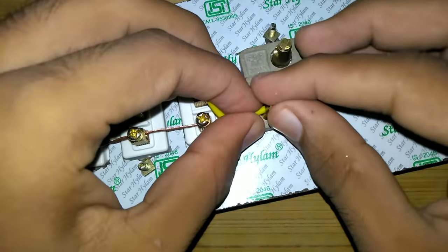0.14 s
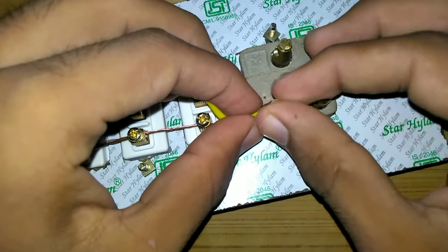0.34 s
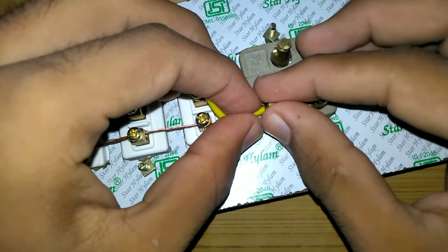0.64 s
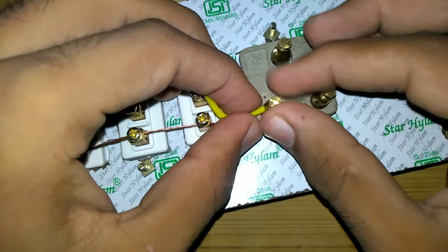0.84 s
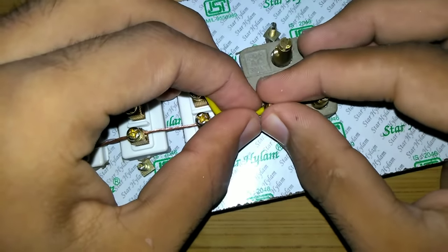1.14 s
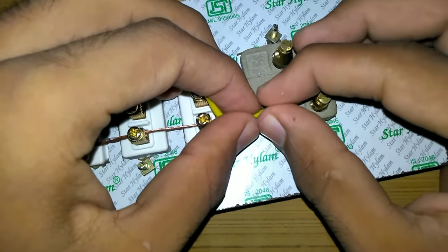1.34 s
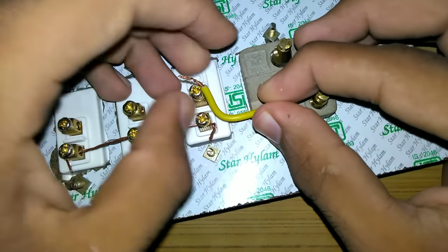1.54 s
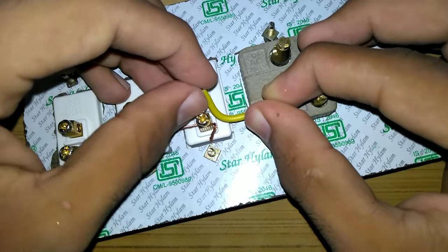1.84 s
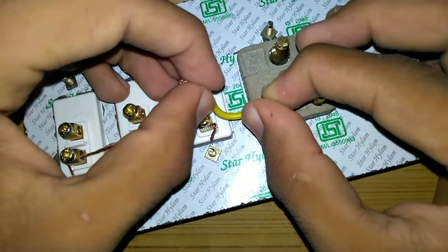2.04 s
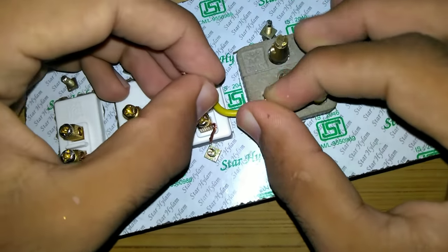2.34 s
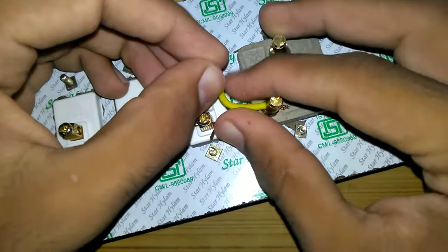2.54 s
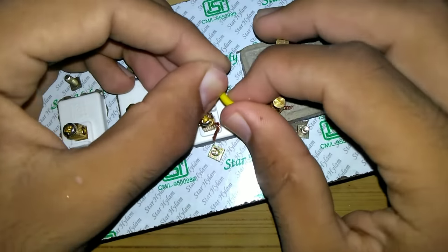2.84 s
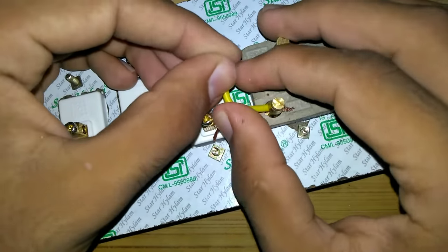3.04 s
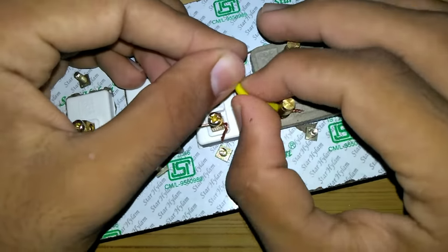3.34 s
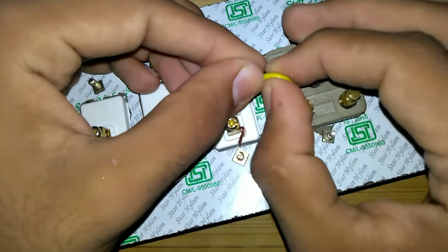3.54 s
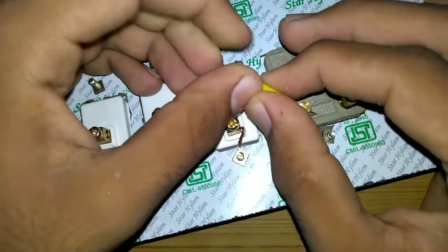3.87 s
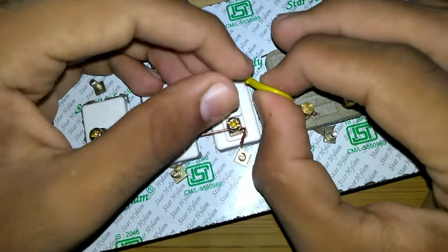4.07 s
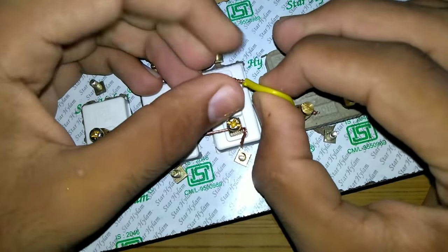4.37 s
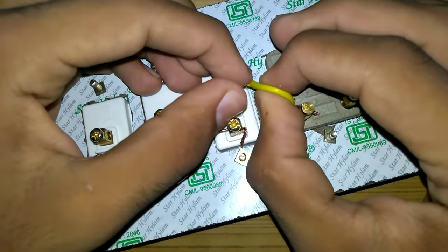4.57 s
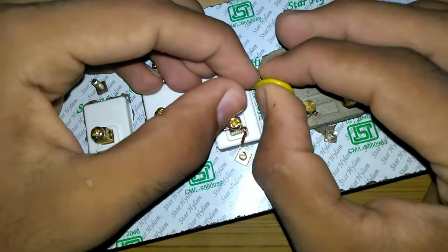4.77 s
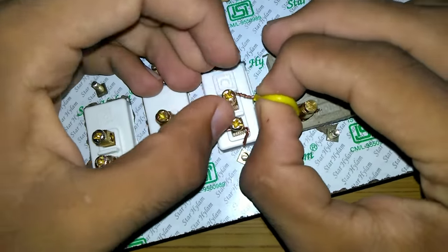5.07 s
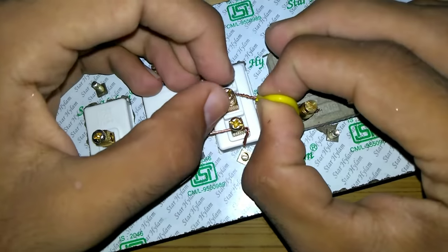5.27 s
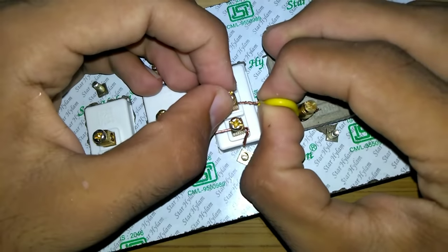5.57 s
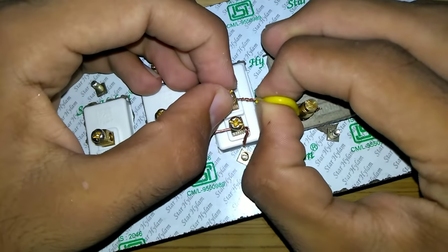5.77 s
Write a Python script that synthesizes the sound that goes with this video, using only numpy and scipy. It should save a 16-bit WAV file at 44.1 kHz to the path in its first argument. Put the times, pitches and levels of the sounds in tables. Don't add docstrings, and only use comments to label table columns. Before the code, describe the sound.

A close phone microphone at an indoor desk picks up hands working a wire among brass screw terminals on a thin board. A firm low bump comes at 0.15 s, then dry clicks, wire slips and skin rubbing crowd the first second, with a brassy cluster near 1.0. It thins until a light tick at 1.5 and a crisp, bright one at 1.85. Small slips follow around 2.2, then the strongest later board knock at 2.53 with clicks around it and low hand rumble to about 2.8. Tiny strand ticks and rubbing run through 3.0-3.5, leading to the sharpest metallic snap and ping at 3.58. Another bright tick lands at 4.18, a smaller one at 4.6, then slips and clicks near 5.07, 5.33-5.45, 5.62 and 5.84. Contacts last milliseconds with little room echo; hiss blooms after them and fades unevenly within fractions of a second, nearly silent between.

```python
import sys
import numpy as np
from scipy import signal
from scipy.fft import rfft, irfft
from scipy.io import wavfile
from scipy.ndimage import uniform_filter1d

SR = 44100
rng = np.random.default_rng(int(sys.argv[2]) if len(sys.argv) > 2 else 0)


def natural_amplitude(level_db):
    exponent = np.asarray(level_db, float) / 20
    return 10 ** exponent


def to_wav(sig):
    pcm = np.clip(np.atleast_2d(sig), -1, 1) * 32767
    pcm = np.round(pcm).astype(np.int16)
    wavfile.write(sys.argv[1], SR, pcm.T)


N = 260631

# (frequency [Hz], level per Hz [dB])
ROOM_HISS = [(110, -40), (180, -4.5), (283, -9), (383, 3.5), (769, -11.5), (845, -10), (928, -6),
             (1140, -7), (1410, -6.5), (1670, -8.5), (4700, -10), (6470, -9), (11400, -14.5),
             (15400, -26.5), (16300, -51)]
# (time [s], weight [dB], time to fade 20 dB [s])
LEANING_HANDS = [(.02, -53.5, 0.23), (0.139, -34, 0.3), (0.481, -38.5, 0.09), (0.898, -38.5, 0),
                 (1.069, -57, 0.4), (1.202, -53, 0.33), (1.33, -49.5, 0.4), (1.508, -44.5, 0.25),
                 (1.727, -41, 0.18), (1.896, -42.5, 0.42), (2.159, -46, 0.3), (2.38, -45, 1),
                 (2.52, -33, 0.14), (2.8, -37, 0.24), (3.069, -43.5, 0.1), (3.34, -36, -0.5),
                 (3.69, -53.5, 0.6), (3.95, -48, 0.53), (4.18, -55.5, -0.28), (4.442, -53.5, 0.54),
                 (4.77, -65.5, 3.3), (5.049, -61, .3), (5.199, -62, 0.16), (5.401, -49, 0.25),
                 (5.6, -63, -1.5), (5.831, -68, -4)]
# (start [s], length [s], pressure [dB], dryness [dB])
SKIN_SLIDES = [(0, 0.17, -46, -33), (0.254, 0.31, -50.5, -21), (0.51, 0.55, -48.5, -19),
               (0.99, 0.31, -60.5, 10.5), (2.182, 0.15, -62.5, 17), (2.416, 0.18, -45.5, -23),
               (2.614, 0.21, -44, -14), (2.859, 0.25, -50, -26), (3.203, 0.073, -57, -3.5),
               (3.348, 0.25, -43, -3.5), (3.645, 0.21, -62, 17), (4.395, 0.059, -48.5, -22.5),
               (1.52, 0.041, -52.5, 3), (1.766, 0.12, -53, -21), (4.146, .1, -53, -27),
               (5.301, 0.17, -60.5, -21.5), (2.292, 0.076, -60, -21), (3.612, 0.031, -53, -24.5),
               (0.05, 0.053, -74, -4), (3.358, 0.31, -67, 9.5)]
# (frequency [Hz], level [dB], t60 [s])
BOARD_MODES = [(80.9, -3.5, 0.31), (110.6, -2.5, 0.29), (155.8, -1.5, 0.15), (218.6, -13.5, 0.19),
               (354.5, -3.5, 0.065), (408.3, -2.5, 0.095), (547, 1.5, 0.083), (732, -9, 0.043),
               (790, -2.5, 0.027), (1060, -26.5, 0.054)]
# (time [s], strength [dB], length [ms])
LIGHT_TAPS = [(.012, -32, 3.2), (.752, -31.5, 8.9), (.805, -38.5, 6.1), (1.156, -30, 8.4),
              (1.284, -33, 2.9), (2.392, -42, 8.5), (3.566, -51.5, 5.1), (3.969, -33.5, 6.2),
              (4.428, -39, 5), (4.452, -43.5, 3), (5.449, -36, 4.6), (3.28, -42.5, 7.6), (4.124, -34.5, 4),
              (4.709, -45.5, 6), (4.97, -40, 8.2), (5.074, -49, 4.6), (5.089, -47, 7.7)]
# (time [s], strength [dB], share in the high modes [dB], length [ms])
BOARD_BUMPS = [(.142, -34, -20, 9.5), (0.152, -13.5, -7, 2.9), (.27, -35.5, 3, 6.2),
               (.488, -26.5, -24, 7.1), (0.672, -43, 13, 8.6), (0.906, -40, 7, 4.5),
               (0.979, -34.5, -1, 10.4), (1.516, -46, 10.5, 9.1), (1.744, -38.5, -10.5, 7.6),
               (1.769, -39, -16, 2.6), (1.901, -25.5, -13, 4.8), (2.187, -39, 3, 4.3),
               (2.451, -62, -1, 9.5), (2.527, -13.5, 5, 3.4), (2.589, -29, -3, 2.9), (2.766, -33, -26, 2.1),
               (2.812, -25, -16, 3.76), (3.086, -28, -25, 2.6), (3.206, -39, -22, 4),
               (3.346, -35.5, -15, 4.4), (3.45, -55, -12, 3), (3.863, -33, -2, 3.95),
               (4.364, -38.5, -18, 6.9), (5.395, -41.5, -27, 5.2), (5.625, -36.5, 3, 4.7),
               (5.845, -36.5, -9.5, 7.1)]
# (centre [Hz], width [Hz])
CRACK_BANDS = [(1310, 1970), (3150, 3000), (9700, 4500), (6560, 2380)]
# (centre [Hz], width [Hz], level [dB])
BRASS_BANDS = [(1414, 223, -1.5), (2040, 38, -22.5), (3020, 336, -4), (4330, 660, -5), (5080, 990, -5),
               (7170, 130, -8), (8970, 260, -4), (10740, 550, -11)]
# (time [s], strength [dB], edge of nail [dB])
FINGER_KNOCKS = [(.0341, -33, -23), (0.152, -38, -31), (.7526, -33.5, -27.5), (0.9309, -31.5, -29),
                 (1.0001, -23, -11), (1.1328, -42, -11), (1.1572, -43, -30), (1.286, -43, -5.5),
                 (1.536, -48, -7), (2.1519, -42, -7), (2.753, -43.5, 0.5), (2.8462, -41, -2.5),
                 (3.034, -49.5, 9), (3.0648, -52, -10), (3.0909, -47, 1), (3.2797, -45, -4),
                 (3.5641, -36, -10), (3.8483, -35, -39), (3.9144, -62, -17), (4.0911, -41.5, -4),
                 (4.3653, -41.5, -3.5), (4.4524, -42, -2), (4.7084, -42.5, -10), (4.9714, -43, -6.5),
                 (5.2794, -41, -14)]
# (time [s], strength [dB], share in the board [dB], share in the switch body [dB])
STRAND_BRUSHES = [(.040, -34.5, -2.5, -5.5), (.050, -39, -14, -4), (0.061, -44, -7, -7),
                  (.433, -24, -13, -5), (.688, -36.5, -13, 3), (0.775, -40, -21, -4), (.868, -46, 2, 2),
                  (1.5348, -43, -13, -3.5), (2.59, -27, -22, -9), (2.765, -36.5, -11, -16),
                  (2.917, -41, -4.5, -9), (3.024, -47, -6, -12), (3.094, -35.5, -12, -7.5),
                  (3.575, -20.5, -19, -14), (3.602, -30, -17, -10.5), (4.203, -45, -16, -9),
                  (5.109, -37, -15, -11.5), (5.389, -28, -12, -12), (5.401, -38, -10, -12)]
# (time [s], strength [dB], share in the board [dB], share in the switch body [dB])
SCREW_CONTACTS = [(.179, -34.5, -27, -38), (.2359, -22.5, -10.5, -11), (.4234, -28, -13, -2),
                  (.536, -24, -19, -6.5), (.5567, -30.5, -7, -11), (.6719, -33, -6, -1.5),
                  (1.0066, -23, -61, -6.5), (1.7389, -27, -12.5, -10), (1.8548, -12, -34, -17),
                  (2.1789, -27.5, -22.5, -8), (2.488, -23, -8.5, 1), (2.4978, -28.5, -1.5, -8),
                  (2.5293, -22.5, -4.5, -7.5), (2.5879, -27, -7, -6), (3.0495, -39, -39, -14),
                  (3.3094, -33, -9, -30), (3.3737, -35, -5, -11), (3.5135, -28, -13.5, -15.5),
                  (3.5689, -25, -14.5, -11), (3.5759, -11, -23, -23), (3.6494, -37, 5.5, -14),
                  (3.6967, -33, -6, -18), (4.1242, -29.5, -13.5, -11), (4.1774, -12.5, -32.5, -19.5),
                  (4.5925, -26, -18.5, -10.5), (5.0438, -26, -12.5, -17.5), (5.3966, -23.5, -19, -11.5),
                  (5.449, -30, -7, -14), (5.6239, -29, -10, -13)]
# (time [s], strength [dB], share in the board [dB], share in the switch body [dB])
WIRE_SLIPS = [(.2764, -31.5, -2, -1.5), (.4095, -28.5, -7.5, -10), (.440, -22.5, -11, -21),
              (.626, -24.5, -19, -27), (.8976, -25, -15, -2), (.9079, -24.5, -11, -13.5),
              (.9782, -18.5, -40, -6.5), (1.1706, -35.5, 1, -4), (1.4651, -49, -44, -55),
              (1.5162, -36, -21.5, -5.5), (2.1909, -24.5, -50, -59), (2.2128, -21.5, -22.5, -37.5),
              (2.2293, -27.5, -14, -15.5), (2.4547, -32.5, -9, -9), (2.4672, -26.5, -19.5, -13.5),
              (2.5816, -27, -16, -18.5), (2.8199, -33, -18, -16.5), (3.1215, -24.5, -7, -12.5),
              (3.5366, -25.5, -23, -10), (3.5966, -28, -9, -13), (3.8645, -37, 8.5, -19.5),
              (4.144, -32.5, -11.5, -8), (4.1653, -25.5, -13, -15), (5.0235, -51, -15, -3),
              (5.0742, -21.5, -17.5, -17.5), (5.0884, -20, -17, -27), (5.3265, -20.5, -19, -15),
              (5.8408, -28.5, -12, -11.5)]
# (time [s], strength [dB], lower ring [Hz],
# upper ring [Hz], upper share [dB])
CONTACT_RINGS = [(0.1776, -42.5, 7000, 9460, -5), (0.2365, -25, 7120, 8650, -11.5),
                 (0.4222, -24.5, 6960, 9260, -21), (0.536, -42, 7180, 9050, -7),
                 (0.558, -39, 5800, 12150, 3.5), (0.624, -29.5, 7170, 9030, -10),
                 (0.6692, -29.5, 7030, 11000, -10.5), (0.898, -34, 5900, 9060, -10),
                 (0.9807, -25.5, 7060, 12400, -18.5), (1.0055, -22, 6310, 9100, -11),
                 (1.5146, -36.5, 7300, 8500, -26), (1.7375, -29, 7210, 10860, -13),
                 (1.8566, -21, 7400, 11060, -13), (2.18, -28.5, 8200, 9460, -10),
                 (2.466, -34.5, 7100, 8300, -12), (2.466, -35, 7170, 9850, -10),
                 (2.486, -32.5, 5840, 8600, -6.5), (2.5287, -28, 8190, 8840, -13.5),
                 (2.5865, -30, 6940, 9300, -9), (2.5879, -26, 7000, 11940, -9),
                 (2.82, -36.5, 6970, 8430, -8.5), (3.119, -32.5, 6860, 8890, -11),
                 (3.374, -36, 7050, 9500, -16), (3.5126, -36.5, 7200, 10870, -5),
                 (3.5756, -26, 6250, 11600, 4), (3.5685, -25, 6800, 10900, 0),
                 (3.5755, -13, 7150, 10750, -1.5), (3.8645, -38, 7220, 9160, -3),
                 (4.127, -34, 7340, 9340, -10), (4.164, -29.5, 6800, 9200, -14),
                 (4.1776, -23.5, 7440, 9850, -2), (4.5925, -32.5, 7350, 10760, -11.5),
                 (5.0436, -34.5, 6020, 10300, -9), (5.0724, -31, 7360, 9200, -6),
                 (5.3242, -35, 6900, 9100, -9), (5.4006, -28, 5170, 8900, -23),
                 (5.3985, -30, 7160, 9550, -17), (5.6235, -33.5, 7090, 11080, -18),
                 (5.8396, -37, 7140, 10700, -11),
                 (0.034, -38.5, 5450, 11600, -8), (0.4333, -32, 7100, 8750, -16),
                (0.4396, -29, 8370, 9400, -9), (1.4651, -47, 7190, 9830, -29),
                (1.5369, -45, 7170, 8620, -32), (2.4974, -27.5, 5330, 10980, -6.5),
                (2.7635, -48, 5160, 9780, -11), (2.8457, -44, 5070, 9500, -4),
                (3.0011, -48.5, 8540, 8570, -3.5), (3.0254, -42.5, 7360, 9300, -5),
                (3.04, -40.5, 7310, 9050, -2), (3.0495, -44, 7400, 9200, -5), (3.065, -44, 8200, 9150, -2),
                (3.0855, -46.5, 8500, 8660, 2), (3.0929, -38.5, 6860, 9050, -7),
                (3.2804, -42.5, 5140, 9300, -9), (3.3094, -49, 7230, 9210, -30),
                (3.345, -50.5, 7370, 9100, -9), (3.4266, -45, 7430, 8740, -21),
                (3.4594, -38, 7100, 9900, -14), (4.09, -58, 7400, 8500, 7), (5.0884, -40, 6900, 9600, -21),
                (5.449, -35, 5400, 10800, -9)]
# (time [s], strength [dB], pitch [Hz], length [ms])
STRAND_GRAZES = [(.036, -36.5, 6500, .8), (.037, -38, 3000, 0.92), (.179, -39, 5300, 1),
                 (.180, -38, 3000, 1.2), (.180, -42.5, 10700, .6), (5.40, -39, 600, 5), (4.19, -42, 350, 7),
                 (1.003, -30, 1920, 1.7), (1.158, -26, 1980, 1.8), (1.235, -28, 810, 3.3),
                 (1.465, -37.5, 5400, 2.5), (1.466, -37, 7200, 1.8), (5.45, -37, 2100, 1),
                 (4.39, -40, 380, 7), (2.14, -47, 800, 4), (2.196, -41.5, 400, 6), (2.234, -42, 1040, 4),
                 (2.821, -42.5, 4730, 0.48), (2.821, -36, 9600, .6), (2.82, -41, 11630, 0.56),
                 (2.846, -40, 2450, 1), (2.846, -41, 5800, .6), (2.915, -37, 3000, 1.5),
                 (2.985, -39, 3100, 1.5), (3.002, -39, 7000, 1.5), (3.002, -42, 9800, 1.5),
                 (3.032, -44, 5500, 0.57), (3.032, -40, 10770, 1), (3.05, -37, 2440, 2),
                 (3.095, -36, 5730, .6), (3.095, -42, 11000, 0.67), (3.283, -35, 9280, .8),
                 (3.30, -43, 10400, 1), (3.343, -41, 4000, 1), (3.343, -40, 5750, .6),
                 (3.376, -42, 2600, 1.1), (3.262, -38, 5500, .5), (3.425, -43, 9200, .6),
                 (2.817, -35, 1900, .7), (3.47, -44, 6000, .5), (3.475, -37, 2500, 0.55),
                 (4.092, -43.5, 3010, 1.7), (4.125, -44, 800, 3.7), (4.365, -44, 546, 5),
                 (4.452, -35.5, 1420, 2.5), (4.699, -40, 2800, 0.84), (5.044, -42, 700, 4.6),
                 (5.075, -39, 2450, 2.2), (5.075, -38, 1390, 2.5), (5.40, -34, 2200, 1)]
# (frequency [Hz], time [s])
CLOSE_TIMES = [(100, 0.12), (500, 0.47), (1500, 0.25), (3500, 0.3), (7000, 0.27), (9500, 0.21),
               (13200, 0.12), (16000, 0.12)]
# (centre [Hz], width [Hz], extra share of time [1])
LINGERING_BANDS = [(1116, 40, 0.076), (1450, 120, 0.42), (2600, 100, 0.47), (3700, 190, -0.09),
                   (1820, 90, -.35), (8130, 200, -0.49), (10300, 200, -0.53), (4080, 250, -.25),
                   (5700, 60, 0.12), (7160, 650, -0.048), (11600, 1300, 0.41), (15600, 350, 1.2)]


def unit(x):
    return x / np.sqrt(np.mean(x ** 2))


def band(x, hz, width):
    edges = [hz - width / 2, hz + width / 2]
    return signal.sosfilt(signal.butter(2, edges, "bandpass", fs=SR, output="sos"), x)


def burst(x, ms, rise_ms, edge):
    t_ms = np.arange(len(x)) / SR * 1000
    return x * (1 - np.exp(-t_ms / rise_ms)) * np.exp(-(t_ms / max(ms, .3)) ** edge)


def even(x, size):
    power = np.sum(x ** 2)
    limit = 1.5 * uniform_filter1d(np.abs(x) + 1e-9, size=9)
    for _ in range(4):
        z = rfft(x)
        z = z * np.sqrt(power / uniform_filter1d(np.abs(z) ** 2 + 1e-12, size=size))
        x = np.clip(irfft(z, len(x)), -limit, limit)
    return x


def add(out, s, x):
    i = max(int(s * SR), 0)
    out[i:i + len(x)] += x[:N - i]


def swell(s, hold_s, rise_s, fade_s):
    t = np.arange(N) / SR - s
    rise = np.clip(t / max(rise_s, .002), 0, 1) ** 2
    return rise * natural_amplitude(-20 * np.maximum(t - rise_s - hold_s, 0) / max(fade_s, .02))


def ring(x, modes):
    out = 0
    for hz, db, t60 in modes:
        pole = np.exp(2j * np.pi * hz / SR - np.log(1000) / (t60 * SR))
        out = out + natural_amplitude(db) * signal.lfilter([1], [1, -pole], x).imag
    return out


def room():
    hz, db = np.transpose(ROOM_HISS)
    bins = np.arange(N // 2 + 1) * SR / N + 1
    colour = natural_amplitude(np.interp(np.log(bins), np.log(hz), db))
    return natural_amplitude(-43) * unit(irfft(rfft(rng.standard_normal(N)) * colour, N))


def hands():
    rest_db, lean_rise_s, lean_hold_s = -71.5, 0.017, 0.0065
    slide_rise_s, slide_fade_s = 0.13, 0.11
    rumble = unit(band(ring(rng.standard_normal(N), BOARD_MODES[:3]), 75, 149))
    weight = natural_amplitude(rest_db)
    for s, db, fade_s in LEANING_HANDS:
        weight = weight + natural_amplitude(db) * swell(s, lean_hold_s, lean_rise_s, fade_s)

    noise = rng.standard_normal((2, N))
    grain_size = np.minimum(rng.exponential(size=(2, N // 64 + 1)), 4)
    grains = noise * natural_amplitude(1.8 * np.repeat(grain_size, 64, axis=1)[:, :N])
    dull = unit(band(grains[0], 467, 917))
    bright = unit(band(grains[1], 5700, 8200))
    skin = np.zeros(N)
    for s, hold_s, db, dry_db in SKIN_SLIDES:
        pressure = natural_amplitude(db) * swell(s - slide_rise_s, hold_s, slide_rise_s, slide_fade_s)
        skin += pressure * (dull + natural_amplitude(dry_db) * bright)
    return rumble * weight + skin


def thuds():
    tap_mid_db, jolt_db, jolt_ms = -26.5, 2, 7
    low, middle, high = 0, 1, 2
    pushes = []  # (time, length ms, (lane, dB), ...)
    for s, db, high_db, ms in BOARD_BUMPS:
        pushes.append((s, ms, (middle, 0.67 * db - 25.0), (high, 0.79 * (db + high_db) - 17.0)))
    for s, db, ms in LIGHT_TAPS:
        pushes.append((s, ms, (middle, 1.3 * (db + tap_mid_db) - 25.5), (high, 0.85 * db - 15.5)))
    for s, db, _ in LEANING_HANDS:
        pushes.append((s, jolt_ms, (low, 0.95 * (db + jolt_db) - 39.0)))

    lanes = np.zeros((3, N))
    for (s, ms, *parts), grit in zip(pushes, rng.standard_normal((len(pushes), 3000))):
        push = burst(0.18 + grit, ms, rise_ms=2.67, edge=1.8) / np.sqrt(ms)
        for lane, db in parts:
            add(lanes[lane], s - .003, natural_amplitude(db) * (push if lane == low else even(push, size=9)))
    board = ring(lanes[low], BOARD_MODES[:3])
    return board + ring(lanes[middle], BOARD_MODES[3:7]) + ring(lanes[high], BOARD_MODES[7:])


def ticks():
    screw_brass_db, wire_brass_db, strand_brass_db = -7.5, -14.5, -7.0
    hard_brass = 0.28
    knock_db, knock_brass_db, knock_top_db = 1, -0.5, -1.5
    hits = []  # (time, board dB, switch body dB, brass dB, top dB)
    for rows, brass_db in ((SCREW_CONTACTS, screw_brass_db), (WIRE_SLIPS, wire_brass_db)):
        for s, db, board, body in rows:
            hits.append((s, db + board, db + body, db + brass_db + hard_brass * (db + 25.0), db))
    for s, db, edge in FINGER_KNOCKS:
        db = db + knock_db
        nail = db + edge
        hits.append((s, db, nail, nail + knock_brass_db, nail + knock_top_db))
    noise = rng.standard_normal((len(hits), 1500))
    for s, db, board, body in STRAND_BRUSHES:
        hits.append((s, db + board, db + body, db + strand_brass_db, db))
    noise = np.vstack([noise, noise[:len(STRAND_BRUSHES), ::-1]])

    lanes = np.zeros((4, N))
    for (s, *band_db, top_db), grit in zip(hits, noise):
        crack = even(burst(np.sign(grit), ms=2.94, rise_ms=.95, edge=1.9), size=27)
        for lane, db in zip(lanes, [*band_db, top_db - 6.0]):
            add(lane, s - .0006, natural_amplitude(0.8 * db + 2.0) * crack)
    lanes[2:] *= natural_amplitude(-3.5)
    lanes[1:3] *= -1
    raw = sum(band(lane, hz, w) * np.sqrt(4000 / w) for lane, (hz, w) in zip(lanes, CRACK_BANDS))
    raw = raw - natural_amplitude(-15.5) * band(lanes[2], 14200, 3200)
    return raw + sum(natural_amplitude(db) * band(raw, hz, w) for hz, w, db in BRASS_BANDS)


def pings():
    out, t = np.zeros(N), np.arange(800) / SR
    for s, db, low_hz, high_hz, high_db in CONTACT_RINGS:
        tone = np.sin(2 * np.pi * low_hz * t) + natural_amplitude(high_db + 6.0) * np.sin(2 * np.pi * high_hz * t)
        ms = 2.16 * natural_amplitude(-.15 * (db + 30))
        add(out, s - .0003, natural_amplitude(0.89 * db) * burst(tone, ms, rise_ms=.7, edge=1))
    return out


def grazes():
    out, t = np.zeros(N), np.arange(1500) / SR
    for s, db, hz, ms in STRAND_GRAZES:
        ms = max(ms, .3)
        tone = np.sin(2 * np.pi * hz * t)
        add(out, s - .0005, natural_amplitude(db) * 2 / ms * burst(tone, ms, rise_ms=ms / 2, edge=1.2))
    return out


def scatter(near):
    t60_s = .25
    t = np.arange(SR // 4) / SR
    echo = unit(rng.standard_normal(len(t))) * natural_amplitude(-60 * t / t60_s) * (t > .002)
    return natural_amplitude(-12) * signal.fftconvolve(near, echo / np.sqrt(np.sum(echo ** 2)))[:N]


def scene():
    near = ticks() + thuds()
    return (near + pings() + grazes() + scatter(near) + hands() + room())[None]


def reducer(x):
    shut_db, knee_db, span_db, low_knee_db = -37, 5.5, 6.5, 1
    widest, start_open, streak_db = 1.177, 0.28, 2.5
    wide_share, wide_lift_db = 0.64, 1.72
    ragged, close_bend, flutter = 0.18, 1.088, 0.043
    size = dict(fs=SR, nperseg=512, noverlap=384)
    hz, t, z = signal.stft(x, **size)
    hiss = signal.stft(room(), **size)[2]
    learnt = uniform_filter1d(np.mean(np.abs(hiss) ** 2, axis=1), size=3)
    over = uniform_filter1d(np.abs(z) ** 2, size=3, axis=0) / learnt[:, None]
    over_db = uniform_filter1d(np.minimum(10 * np.log10(over + 1e-9), 24), size=5, axis=0)

    around_db = uniform_filter1d(over_db, size=21, axis=0)
    wide_db = (1 - wide_share) * over_db + wide_share * around_db + wide_lift_db
    over_db = np.where(hz[:, None] > 900, wide_db, over_db - low_knee_db)

    err = rng.standard_normal((len(hz), len(t) // 100 + 1))
    err = np.repeat(err, repeats=100, axis=1)[:, :len(t)]
    err = unit(uniform_filter1d(uniform_filter1d(err, size=2, axis=0), size=60, axis=1))
    opening = widest * (1 - np.exp(-np.maximum(over_db - knee_db, 0) / span_db))
    kick = opening * np.minimum(natural_amplitude(streak_db * err), 1.2)
    kick[:, 0] = start_open * natural_amplitude(streak_db * err[:, 0])

    close_s = np.interp(hz, *np.transpose(CLOSE_TIMES)) * np.exp(ragged * rng.standard_normal(len(hz)))
    close_s = close_s * (1 + sum(more * np.exp(-((hz - f) / w) ** 2) for f, w, more in LINGERING_BANDS))
    slide = t / close_s[:, None]
    held = np.maximum.accumulate(kick + slide, axis=1) - slide
    bend = close_bend * np.clip(over, .2, 5) ** -flutter
    gain = np.maximum(np.clip(held, 0, 1) ** bend, natural_amplitude(shut_db))
    return signal.istft(z * gain, **size)[1][:N]


def low_pass(x):
    return signal.sosfilt(signal.butter(12, 16660, fs=SR, output="sos"), x)


def record(dry):
    x = signal.sosfilt(signal.butter(4, 72, "highpass", fs=SR, output="sos"), reducer(dry[0]))
    x = x + natural_amplitude(-80) * band(rng.standard_normal(N), 6600, 13000)
    x = signal.sosfilt(signal.butter(14, 15700, fs=SR, output="sos"), x)
    return low_pass(x[None])


dry = scene()
out = record(dry)
to_wav(out)
```